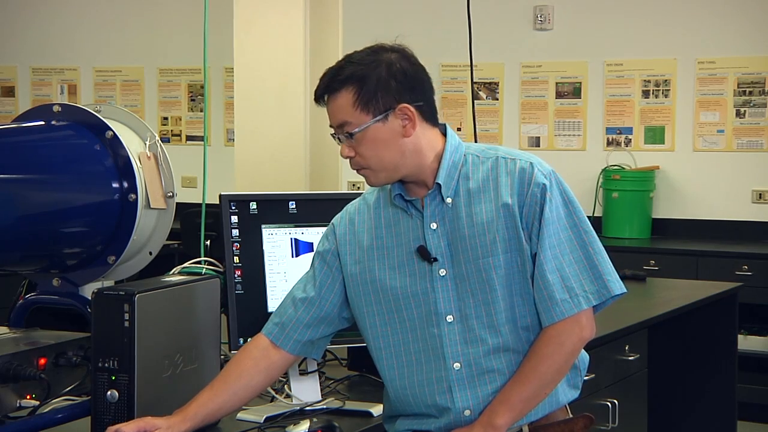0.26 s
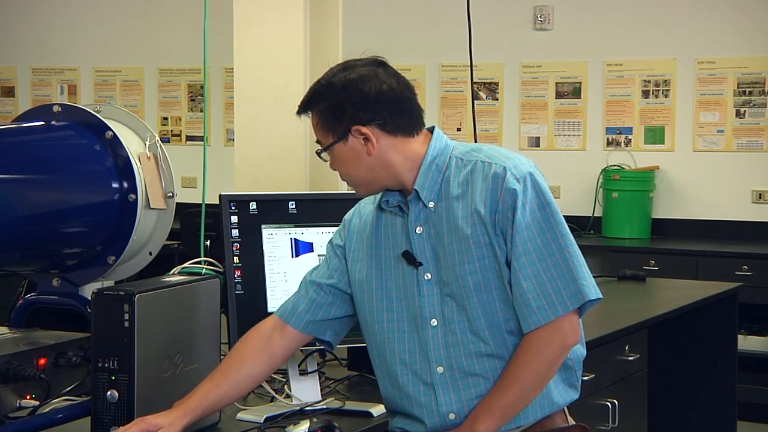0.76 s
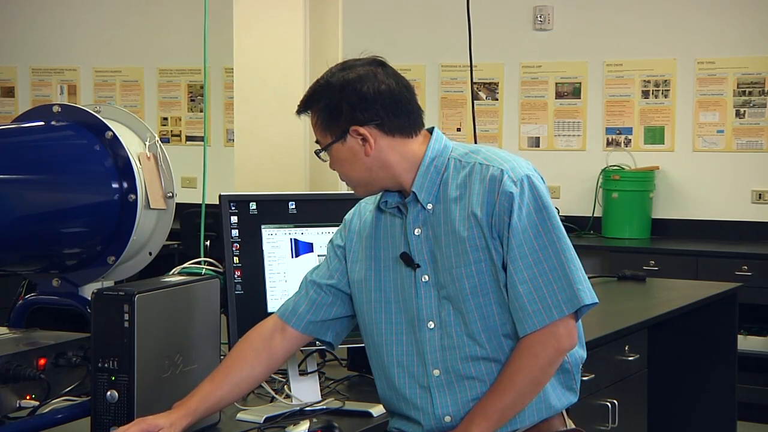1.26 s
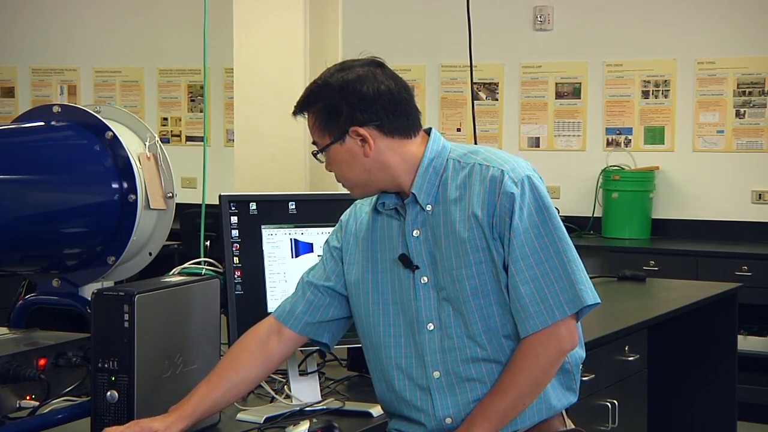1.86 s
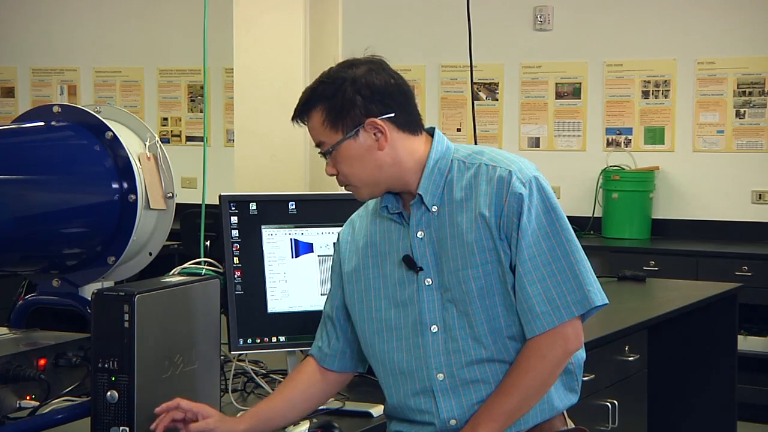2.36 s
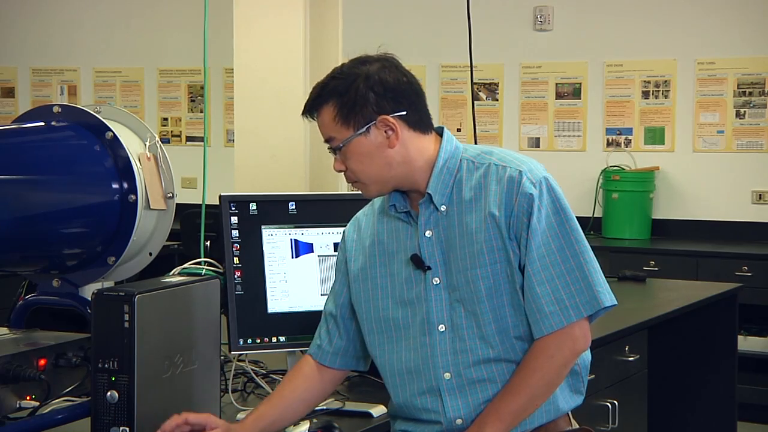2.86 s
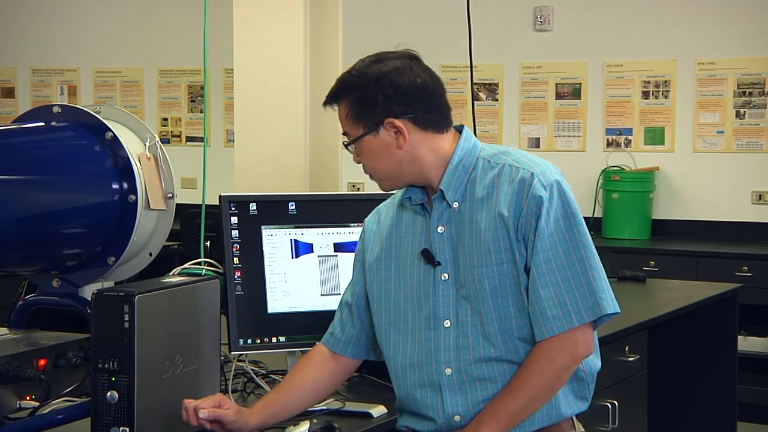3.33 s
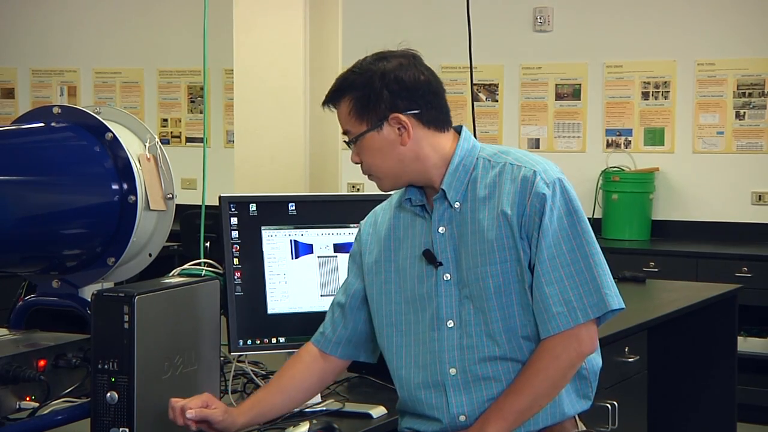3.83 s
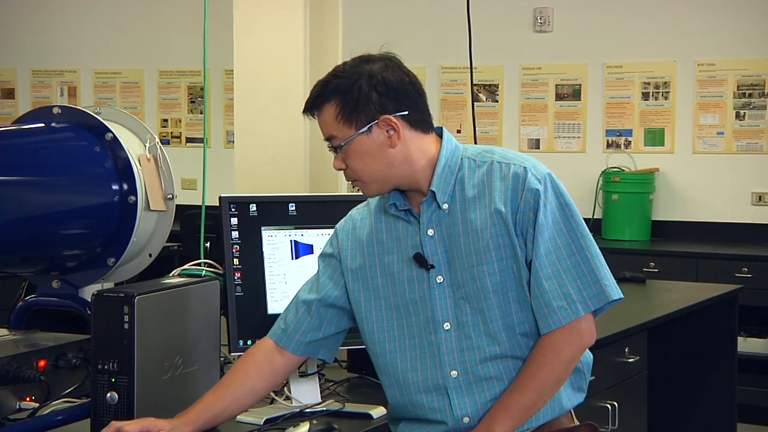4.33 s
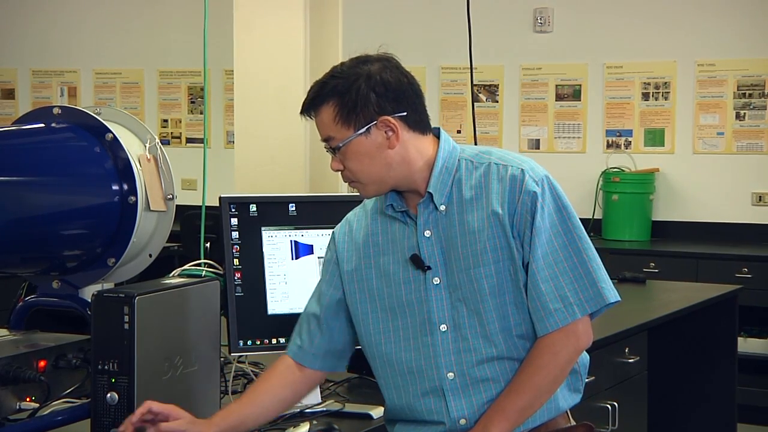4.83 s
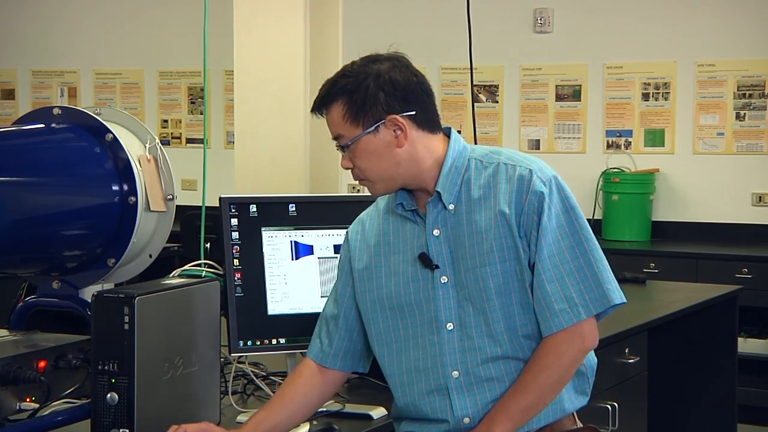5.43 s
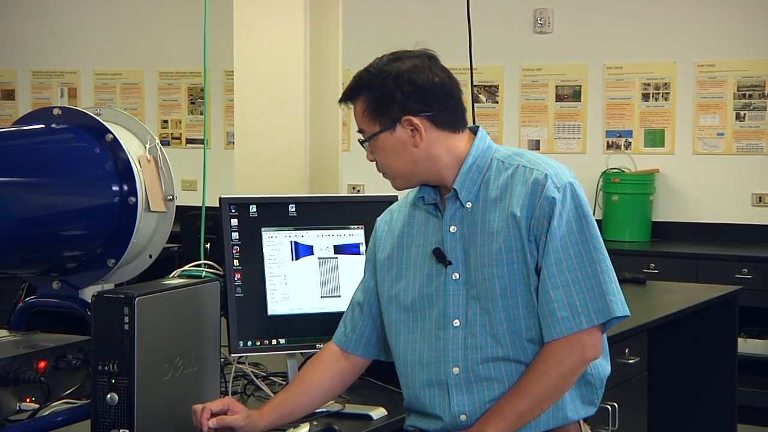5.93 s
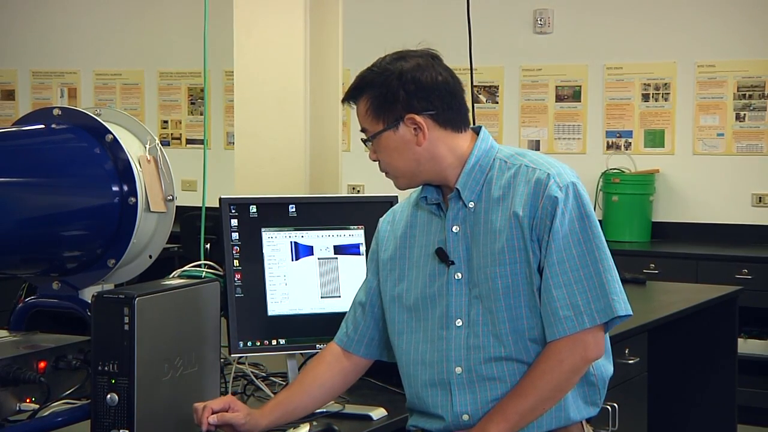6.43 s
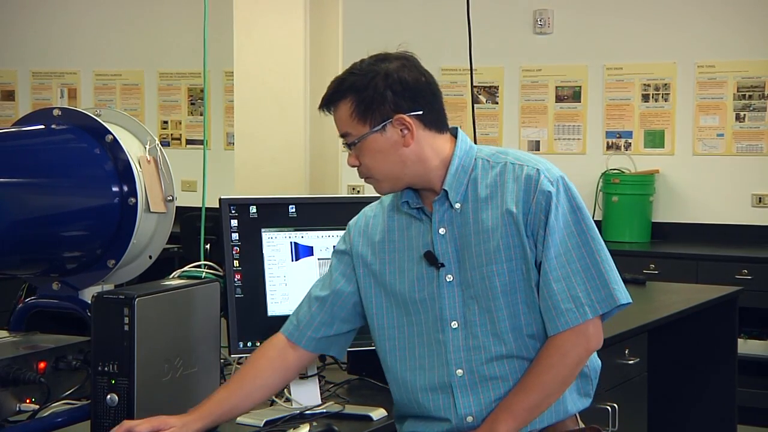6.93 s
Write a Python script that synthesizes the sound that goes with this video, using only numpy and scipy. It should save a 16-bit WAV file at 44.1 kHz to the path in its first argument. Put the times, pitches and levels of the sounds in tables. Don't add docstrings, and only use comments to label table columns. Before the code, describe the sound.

In a laboratory, a large wind tunnel fan is slowing: a broad, low rush of air with a throaty duct hum and a thin falling whine. Light plastic knob ticks come midway. The motor pushes the whine up slightly and holds it, then more clicks, and everything sinks to a soft room hum with a faint very high motor squeal. One steady room microphone, no speech.

```python
import sys
import numpy as np
from scipy import signal
from scipy.io import wavfile
from scipy.ndimage import uniform_filter1d

SR = 44100
rng = np.random.default_rng(int(sys.argv[2]) if len(sys.argv) > 2 else 0)


def waveform_to_disk(signal):
    frames = np.transpose(np.atleast_2d(signal))
    scaled = np.clip(frames, -1, 1) * 32767
    samples = np.round(scaled).astype(np.int16)
    wavfile.write(sys.argv[1], SR, samples)


def voltage_ratio(level):
    return 10 ** (np.asarray(level, float) / 20)


N = 317079
END_S = 7.19
T = np.arange(N) / SR

# time_s, whine_hz
WHINE = [(0, 2630), (.27, 2585), (.45, 2405), (.72, 2375), (.9, 2255), (1.15, 2245), (1.38, 2105),
         (1.6, 2070), (1.75, 2010), (2.3, 1842), (3, 1590), (3.3, 1512), (3.55, 1482), (4, 1640),
         (4.1, 1660), (5.24, 1648), (6.4, 1214), (7.19, 1011)]
# time_s, push_0_to_1
PUSH = [
    (0, 0),
    (3.25, 0),
    (3.7, 1),
    (4.3, 1),
    (5.3, .2),
    (5.6, 0),
    (7.19, 0),
]
# time_s, torque_db
TORQUE = [
    (0, 0),
    (2.35, 0),
    (2.55, -10),
    (2.95, -7),
    (3.3, -2),
    (4.1, -1),
    (5.4, 0),
    (6.1, -1),
    (6.45, -11),
    (7.19, -15),
]

# freq_hz, level_db
RUSH_SPECTRUM = [(13, -58), (30, -59), (59, -38), (90, -6.5), (125, -8), (160, -7), (230, -12.5),
                 (300, -25.5), (550, -23), (1440, -27.5), (2900, -41), (6000, -48.5), (13000, -61.5),
                 (16000, -63)]
# freq_hz, width_hz, lift_db
DUCT_MODES = [(222, 6.8, 12.5), (252.3, 19.4, 8), (267.2, 29, 5), (326, 45, 5.5), (351.8, 34, 8.5),
              (405, 14, 7.5), (688, 26, 12), (1098, 22, 6.5), (1263, 16, 4), (1468, 40, 4),
              (2560, 200, -0.5), (4700, 220, 3.5), (7300, 900, 2), (9700, 1200, 10), (12300, 920, 8)]
FULL_HZ, STALL_HZ = 2630, 1400
FLOW_DB, FLOW_DB_PER_OCTAVE, PUSH_DB, STALL_DB_PER_OCTAVE, HISS_DB = -23, 21.5, 1.5, 21.5, -3.5

# start_s, length_s, peak_db, pitch_hz
LOW_GUSTS = [(.15, 0.49, -37.5, 93), (.58, 0.48, -35.5, 96), (.88, 0.19, -35, 95.6),
             (1.05, 0.093, -37.5, 92.7), (1.19, 0.17, -36.5, 97.7), (1.38, 0.28, -31, 111),
             (1.67, .27, -33, 98), (1.94, 0.11, -32, 101), (2.03, .33, -30, 97), (2.33, 0.26, -27.5, 95.6),
             (2.55, .12, -26.5, 95.8), (2.66, 0.28, -22.5, 95), (2.96, 0.27, -32, 89.15),
             (3.17, 0.26, -30.5, 91.2), (3.39, 0.39, -32.5, 92.5), (3.75, 0.089, -37.5, 93.2),
             (3.85, 0.29, -29.5, 98.4), (4.11, 0.29, -27.5, 96), (4.36, 0.28, -29, 93.95),
             (4.61, 0.22, -29, 95.9), (4.77, .3, -29, 97.5), (5.06, 0.25, -30, 92.8),
             (5.29, .23, -24.5, 90), (5.5, 0.19, -29, 89.6), (5.67, 0.15, -35.5, 90),
             (5.86, 0.24, -36, 96.6), (6.1, 0.36, -39.5, 92), (6.42, 0.1, -43.5, 87),
             (6.5, 0.27, -43, 88.1), (6.82, 0.29, -46.5, 98.1)]
# start_s, length_s, peak_db, pitch_hz
HIGH_GUSTS = [(-.02, 0.27, -23, 157), (.25, 0.098, -24, 155), (.38, 0.083, -25, 165), (.51, .2, -24.5, 168),
              (.69, .13, -25.5, 160), (.83, 0.2, -26, 162), (1.06, 0.19, -26, 170.2), (1.22, .18, -29, 161),
              (1.4, 0.15, -29.5, 158), (1.6, 0.19, -34.5, 162), (1.84, 0.16, -32, 156),
              (2.01, 0.13, -35, 157.5), (2.12, 0.28, -35, 165), (2.47, 0.44, -35.5, 162),
              (2.9, 0.633, -43, 165), (3.58, 0.37, -40.5, 161), (3.88, 0.1, -45, 161.6),
              (3.99, 0.093, -37, 167), (4.17, 0.15, -47.5, 160), (4.35, 0.28, -38, 164),
              (4.63, 0.42, -42, 161), (4.97, 0.3, -38.5, 158.5), (5.25, 1.12, -52.5, 161)]
# start_s, length_s, peak_db
PANEL_GUSTS = [
    (6.25, .26, -50),
    (6.46, .5, -60),
    (7.02, .22, -56),
]
PANEL_HZ = 410
LOW_REST_DB, HIGH_REST_DB, REST_SHARE = -34, -30.5, 0.528

ORDER_DB = [-73, -82, -83, -94, -91, -97]
CRUISE_HZ, WHINE_DB_PER_OCTAVE = 1650, 15
# freq_hz, width_hz, lift_db
HOUSING_LOW = [(1290, 220, 8), (1520, 120, 4), (1655, 60, 9), (2120, 220, -8), (2450, 300, 6),
               (3150, 80, 7), (3680, 110, 9), (3900, 200, -7), (4200, 250, 3), (4580, 300, 6),
               (5750, 700, 5), (6800, 900, 2)]
# freq_hz, width_hz, lift_db
HOUSING_HIGH = [(8300, 200, 7), (9030, 200, 11), (10150, 350, 8), (11150, 300, 9), (11950, 300, 6)]
BLADE_RATIO = 10.4
BLADE_PEAK_DB, BLADE_PEAK_HZ, BLADE_HZ_PER_ROOT_DB = -35.5, 229.6, 3.5

# rest_hz, spacing_multiple, level_db
HIGH_PATTERN = [(15020, -4.5, -6), (15020, -3.5, -5), (15020, -2.5, -6), (15020, -1.5, -1), (15020, -.5, 0),
                (15020, .5, -4), (15020, 1.5, -11), (15020, 4.5, -10)]
# rest_hz, spacing_multiple, level_db
LOAD_PATTERN = [(14013, 0, -3), (13964, 0, 0), (13894, 0, -5), (13846, 0, -5), (13797, 0, -4),
                (13636, 0, -5), (13561, 0, -8), (13378, 0, -11), (14061, 0, -5), (14104, 0, -8),
                (14626, 0, -4), (7031, 0, -4)]
# rest_hz, spacing_multiple, level_db
BRAKE_PATTERN = [(14013, 0, 0), (13990, 0, -7), (14000, -4, -7), (14000, 4, -7), (14000, .8, -8),
                 (14000, -1, -12), (14000, 2.4, -11), (14000, -2.4, -13), (7030, -.5, -2), (6920, 1.7, -5),
                 (6950, 2.5, -9), (7010, -1.5, -10), (7020, -2.5, -15), (7020, .5, -9)]
# start_s, end_s, first_db, last_db
HIGH_SPANS = [
    (0, .75, -69, -73),
    (.75, 3.15, -76.5, -79),
    (3.15, 3.55, -80, -68),
    (3.55, 3.92, -68, -70),
    (3.92, 4.3, -73, -84),
    (4.88, 6.05, -77.5, -78.5),
]
# start_s, end_s, first_db, last_db
LOAD_SPANS = [
    (4.28, 4.336, -83, -69),
    (4.336, 4.94, -76, -72),
]
# start_s, end_s, first_db, last_db
BRAKE_SPANS = [
    (6.085, 7.19, -64, -69),
]
SIDEBAND_RATIO, SLIP_HZ = 10.6, 20

# start_s, peak_db, body_db, top_modes_db, bright_hz
DETENTS = [(2.7881, -41, 10, -21, 5500), (2.8004, -47, 9, -26, 4040), (2.8364, -48.5, 8, -13, 3715),
           (2.8746, -44.5, 4, -12, 3820), (3.0018, -38.5, 3.5, -11, 4700), (3.0064, -49, 9, -13, 5190),
           (3.0112, -42, -7, -15, 4509), (5.2666, -40.5, 6, -13.5, 3723), (5.274, -46, -5, -30, 4600),
           (5.2805, -60, -7, -25, 4360), (5.2855, -49, -3, -23, 3640), (5.3587, -47, 1, -20, 3450),
           (5.3669, -46.5, 2, -24, 3740), (5.478, -43.5, -11, -13, 4775), (5.4815, -43, 3.5, -11, 4340),
           (5.4898, -44, -8, -23, 4660)]
# start_s, peak_db
RATCHET = [(1.5868, -42), (1.6352, -43), (1.6555, -43), (1.6707, -44), (1.7358, -45), (1.7565, -45),
           (1.7896, -54.5), (1.875, -47), (1.9022, -45), (1.9195, -49), (1.941, -47), (4.5222, -48),
           (4.5411, -46), (4.5512, -46), (4.578, -43.5), (4.6, -44), (4.617, -50), (4.6665, -43),
           (4.6847, -44), (4.6973, -47), (4.7208, -47.5), (4.7365, -50), (4.7553, -50), (4.7676, -44.5)]
# freq_hz, decay_width_hz, level_db
KNOB_MODES = [(3350, 260, -6), (4240, 810, 4.5), (5170, 1100, 4), (6200, 830, -3), (7200, 1400, 3.5),
              (8380, 770, -2)]
RATCHET_BODY_DB, RATCHET_TOP_DB = -1, -12
BRIGHT_HZ, PUFF_S, TOP_REST_DB = 4600, .0021, 12.5

# freq_hz, level_db
ROOM_SPECTRUM = [(13, -43), (28, -13.5), (100, -9), (220, -20), (310, -20), (430, -25.5), (1400, -31.5),
                 (2300, -46.5), (3500, -51), (6000, -51.5), (12300, -55), (16000, -57)]
# freq_hz, width_hz, lift_db
ROOM_BANDS = [(690, 36, 7), (1100, 30, 4), (5250, 560, 10), (10700, 400, 5), (15000, 700, 3)]
FANS_DB, FANS_SHARE, THROB_DB = -38.5, 0.16, -65.5


def air():
    def field_db(hz, s):
        hiss = 1 / (1 + (2600 / (hz + 1)) ** 4)
        return read(RUSH_SPECTRUM, hz) + bumps(DUCT_MODES, hz) + flow_db(s) + hiss * HISS_DB
    return voltage_ratio(-8) * noise(field_db, patchy_db=0.0)


def flow_db(s):
    hz = curve(WHINE, s)
    stall_octaves = np.maximum(np.log2(STALL_HZ / hz), 0)
    speed_db = FLOW_DB_PER_OCTAVE * np.log2(hz / FULL_HZ)
    return FLOW_DB + speed_db + PUSH_DB * curve(PUSH, s) - STALL_DB_PER_OCTAVE * stall_octaves


def hum():
    low = duct_mode(LOW_GUSTS, LOW_REST_DB - 14, rest_hz=94, skew=.95, sharp=1.6, share=.13, rate_hz=24)
    high = duct_mode(HIGH_GUSTS, HIGH_REST_DB - 10, rest_hz=161, skew=.85, sharp=1.4, share=.17, rate_hz=30)
    panel = tone(PANEL_HZ, 3.58, 1.24, 10) + 0.37 * gusty(np.full(N, 388.), 0.86, 14)
    panel_power = swells(PANEL_GUSTS, 0.83, 2.85).sum(0)
    return low + high + np.sqrt(panel_power) * panel


def duct_mode(gusts, rest_db, rest_hz, skew, sharp, share, rate_hz):
    power = swells(gusts, skew, sharp)
    rest_power = voltage_ratio(2 * (rest_db + REST_SHARE * (flow_db(T) - FLOW_DB)))
    total = power.sum(0) + rest_power
    pitch_hz = np.array(gusts)[:, 3]
    hz = (pitch_hz @ power + rest_hz * rest_power) / total
    return np.sqrt(total) * gusty(hz, share, rate_hz)


def swells(gusts, skew, sharp):
    progress = np.array([np.clip((T - gust[0]) / gust[1], 0, 1) for gust in gusts])
    peak_power = voltage_ratio([2 * gust[2] for gust in gusts])[:, None]
    return peak_power * abs(np.sin(np.pi * progress ** skew)) ** sharp


def gusty(hz, share, rate_hz):
    feed = 1 + share * (drift(rate_hz) + 1j * drift(rate_hz))
    carrier = np.exp(2j * np.pi * np.cumsum(hz) / SR)
    return evened((feed * carrier).real)


def rotor():
    hz = curve(WHINE)
    effort_db = curve(TORQUE) + WHINE_DB_PER_OCTAVE * np.log2(hz / CRUISE_HZ)
    whine = np.zeros(N)
    for order, db in enumerate(ORDER_DB, 1):
        level_db = db + 1.5 + effort_db + bumps(HOUSING_LOW + HOUSING_HIGH, order * hz)
        whine += voltage_ratio(level_db) * tone(order * hz, 5. * order, 2.5, 24)
    blade_hz = hz / BLADE_RATIO
    blade_db = BLADE_PEAK_DB - ((blade_hz - BLADE_PEAK_HZ) / BLADE_HZ_PER_ROOT_DB) ** 2
    return whine + voltage_ratio(blade_db) * tone(blade_hz, 1.64, 0.73, 10)


def drive(pattern, spans, fuzz_db):
    spacing_hz = curve(WHINE) / SIDEBAND_RATIO + SLIP_HZ * curve(PUSH)
    out = np.zeros(N)
    for rest_hz, k, db in pattern:
        hz = rest_hz + k * spacing_hz
        clean = tone(hz, 3., 2., 9)
        skirt = tone(hz, 80., 3., 400)
        slow_db = -.25 * (rest_hz < 8000) * np.maximum(124 - spacing_hz, 0)
        fast_db = .016 * k * np.maximum(spacing_hz - 165, 0)
        out += voltage_ratio(db + slow_db + fast_db) * (clean + voltage_ratio(fuzz_db) * skirt)
    level = sum(voltage_ratio(curve([(start, first), (end, last)])) for start, end, first, last in spans)
    return evened(out) * uniform_filter1d(level, 400)


def knob():
    size = 900
    t, out = np.arange(size) / SR, np.zeros(N + size)
    ticks = DETENTS + [(s, db, RATCHET_BODY_DB, RATCHET_TOP_DB, BRIGHT_HZ * rng.uniform(0.89, 1.1))
                       for s, db in RATCHET]
    puffs = rng.standard_normal((len(ticks), size))
    puff_shape = (1 - np.exp(-t / 0.00084)) * np.exp(-t / PUFF_S)
    swell = t / PUFF_S
    ring = np.sin(2 * np.pi * 1790 * t) + .55 * np.sin(2 * np.pi * 1520 * t)
    body = swell * np.exp(1 - swell ** 1.28) * ring
    for (s, db, body_db, top_db, bright_hz), puff in zip(ticks, puffs):
        modes = [(bright_hz, 900, 4), (2500, 1200, -4)]
        for hz, width_hz, mode_db in KNOB_MODES:
            top_share = np.clip((hz - 4500) / 2000, 0, 1)
            modes.append((hz, width_hz, mode_db + (top_db + TOP_REST_DB) * top_share))
        bright = sum(voltage_ratio(d - 18 * w * t) * np.sin(2 * np.pi * f * t) for f, w, d in modes)
        bright = np.convolve(puff * puff_shape, bright)[:size]
        at = round(s * SR)
        out[at:at + size] += voltage_ratio(db) * (bright / abs(bright).max() + voltage_ratio(body_db - 3) * body)
    return signal.sosfilt(signal.butter(6, 9800, fs=SR, output="sos"), out[:N])


def room():
    def field_db(hz, s):
        return read(ROOM_SPECTRUM, hz) + bumps(ROOM_BANDS, hz) + 0 * s
    fans = evened(noise(field_db, patchy_db=.95))
    throb = gusty(np.full(N, 37.), .9, 12)
    return voltage_ratio(FANS_DB + FANS_SHARE * flow_db(T)) * fans + voltage_ratio(THROB_DB) * throb


def noise(field_db, patchy_db):
    frames, hz = N // 1024 + 5, np.fft.rfftfreq(4096, 1 / SR)
    real, imag, patches = rng.standard_normal((frames, 2049, 3)).T
    patches = uniform_filter1d(uniform_filter1d(patches, 40, 0), 4, 1)
    s = np.minimum(np.arange(frames) * 1024 / SR, END_S)
    level_db = field_db(hz[:, None], s) + patchy_db * evened(patches)
    spectra = (real + 1j * imag) * voltage_ratio(level_db)
    return signal.istft(spectra, nperseg=4096, noverlap=3072)[1][:N]


def tone(hz, wobble_hz, flutter_db, rate_hz):
    turns = np.cumsum(hz + wobble_hz * drift(rate_hz)) / SR + rng.random()
    return np.sqrt(2) * np.sin(2 * np.pi * turns) * voltage_ratio(flutter_db * drift(rate_hz))


def drift(rate_hz):
    size = int(N / SR * rate_hz) + 3
    return evened(signal.resample(rng.standard_normal(size), N))


def evened(x):
    return x / np.sqrt(np.mean(x ** 2) + 1e-20)


def curve(rows, t=T):
    rows = np.array(rows)
    return np.interp(t, rows[:, 0], rows[:, 1], -150, -150)


def read(points, hz):
    f, level_db = np.transpose(points)
    return np.interp(np.log(hz + 1), np.log(f + 1), level_db)


def bumps(modes, hz):
    return sum(db / (1 + (2 * (hz - f) / width) ** 2) for f, width, db in modes)


def scene():
    singing = drive(HIGH_PATTERN, HIGH_SPANS, fuzz_db=-6)
    singing += drive(LOAD_PATTERN, LOAD_SPANS, fuzz_db=-5)
    singing += drive(BRAKE_PATTERN, BRAKE_SPANS, fuzz_db=-3)
    return (air() + hum() + rotor() + singing + knob() + room())[None]


def band_limit(x):
    return signal.sosfilt(signal.butter(12, 16450, fs=SR, output="sos"), x)


def record(dry):
    edge = signal.firwin(1023, 15740, window=("kaiser", 9), fs=SR)
    mix = signal.oaconvolve(dry, edge[None], "same")
    return band_limit(mix)


dry = scene()
out = record(dry)
waveform_to_disk(out)
```